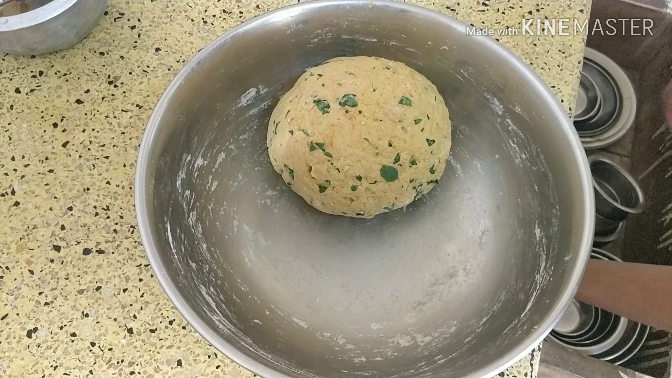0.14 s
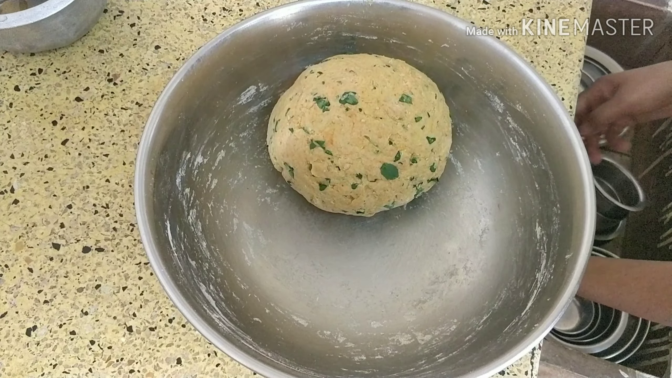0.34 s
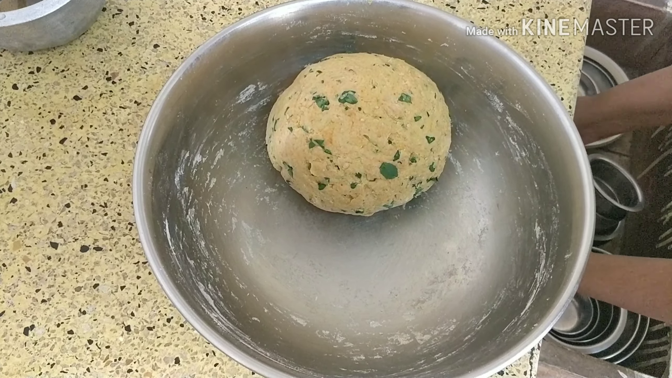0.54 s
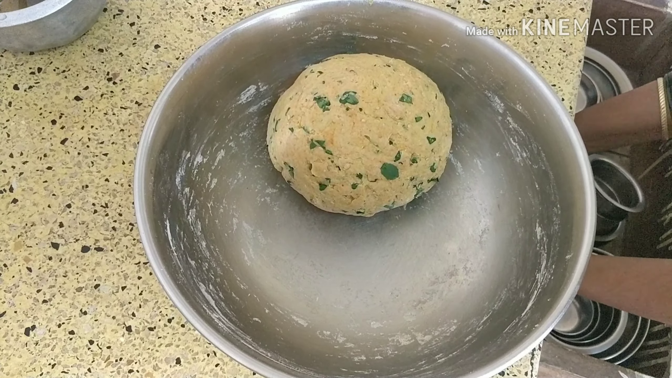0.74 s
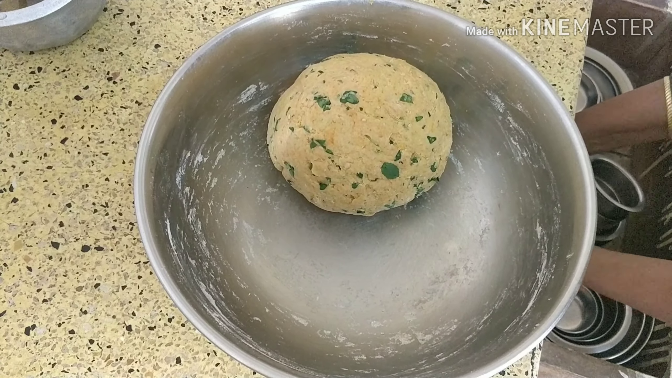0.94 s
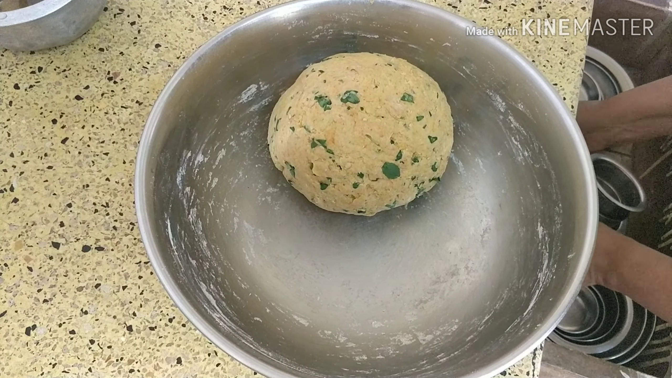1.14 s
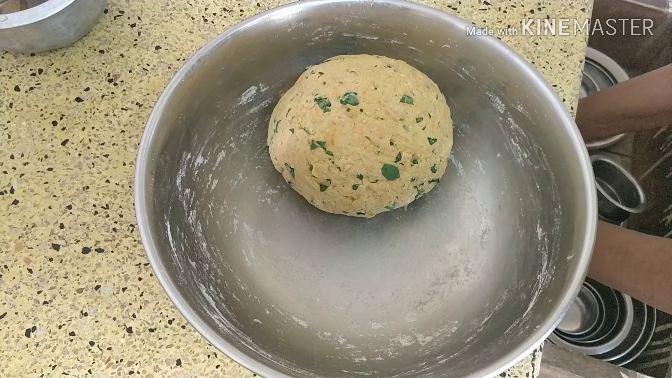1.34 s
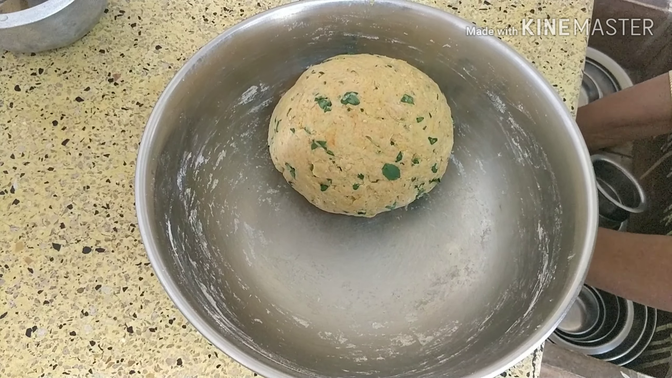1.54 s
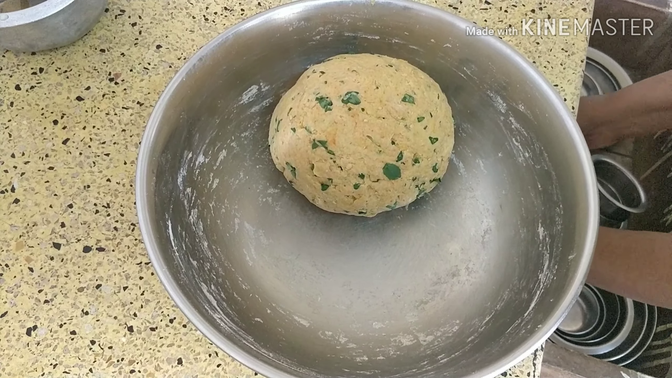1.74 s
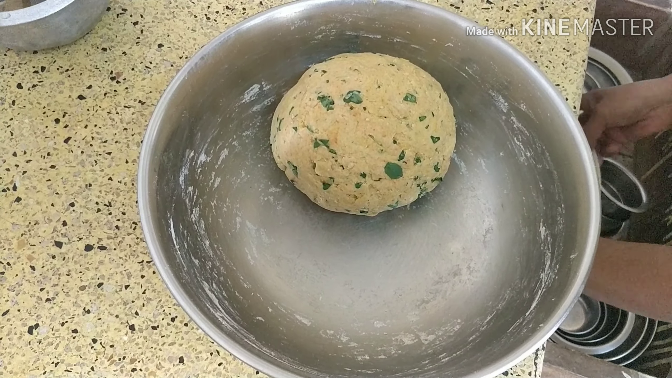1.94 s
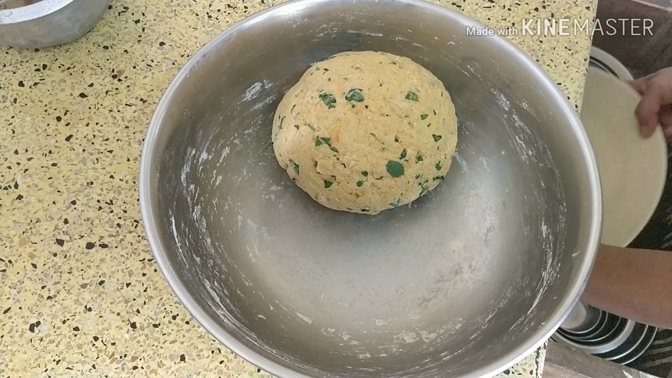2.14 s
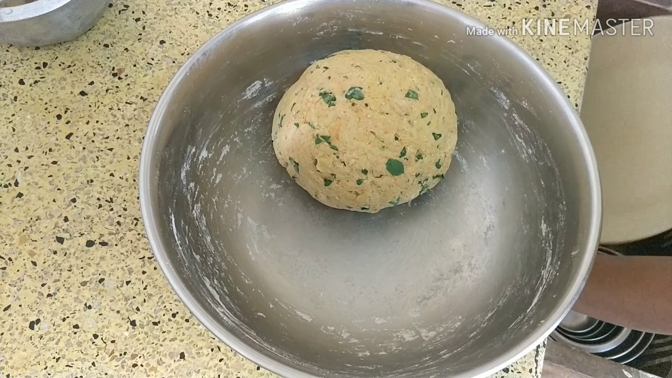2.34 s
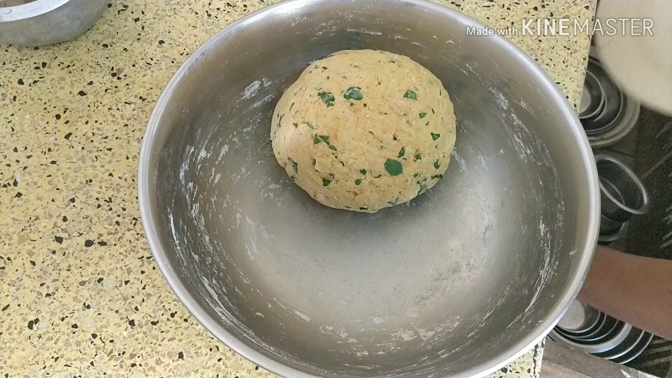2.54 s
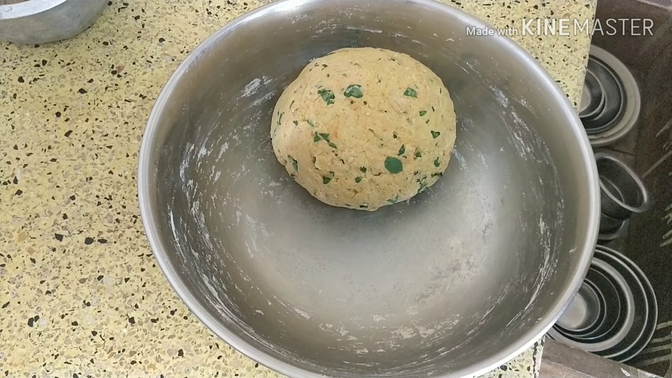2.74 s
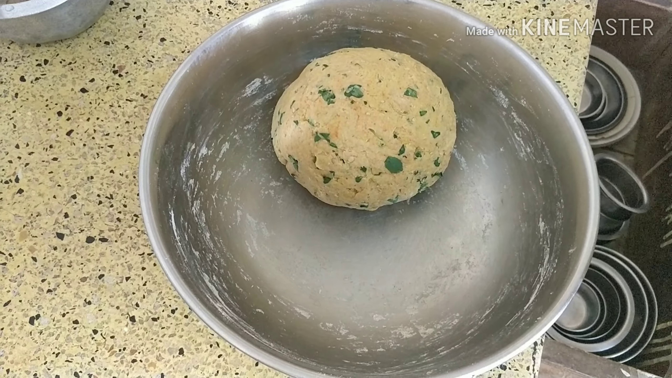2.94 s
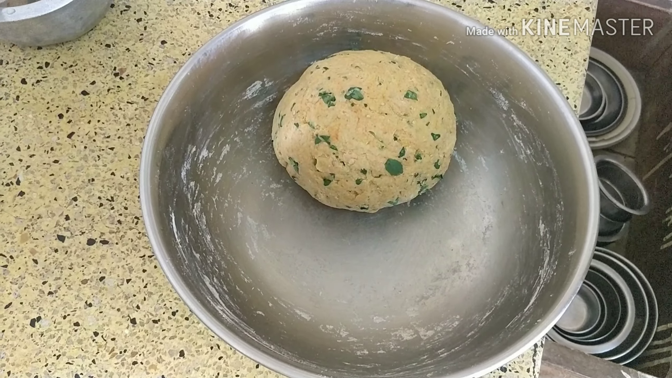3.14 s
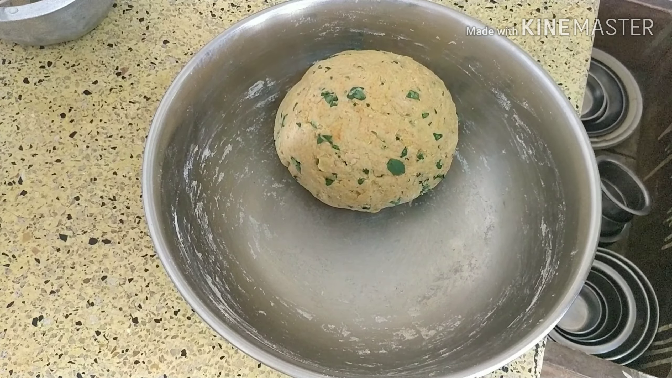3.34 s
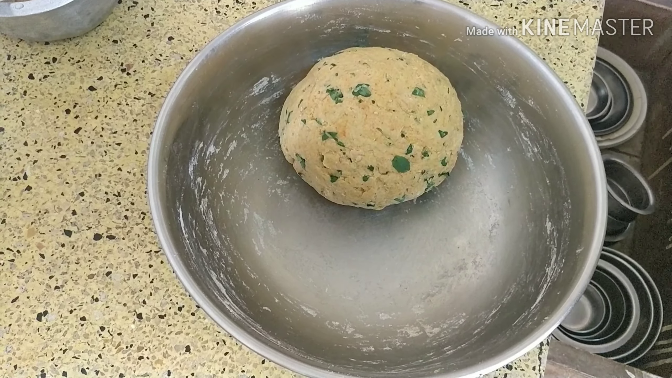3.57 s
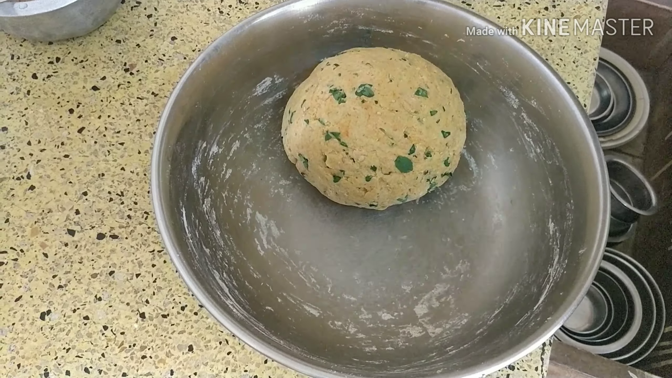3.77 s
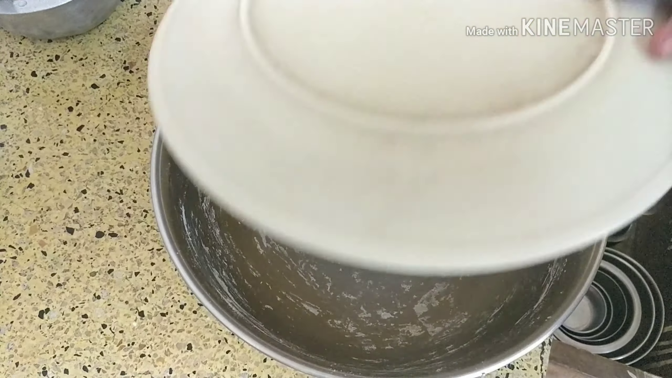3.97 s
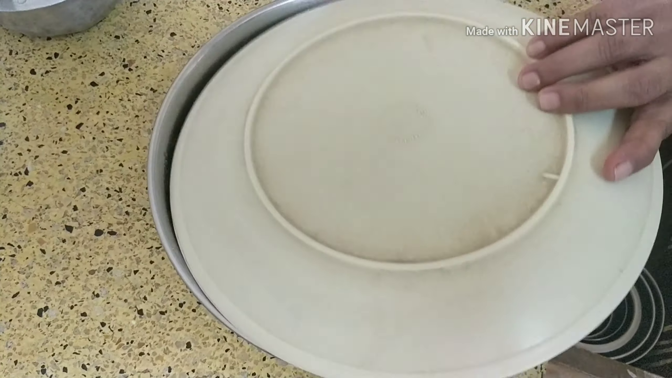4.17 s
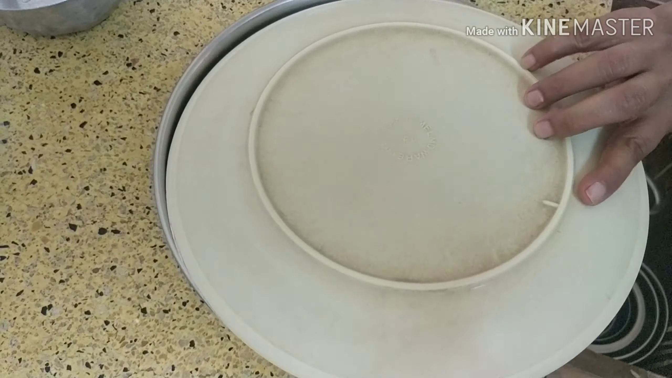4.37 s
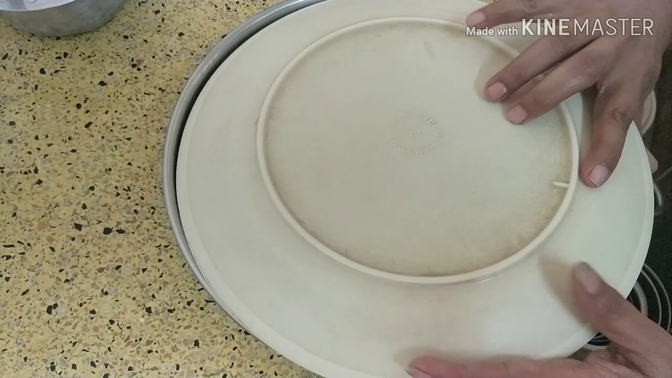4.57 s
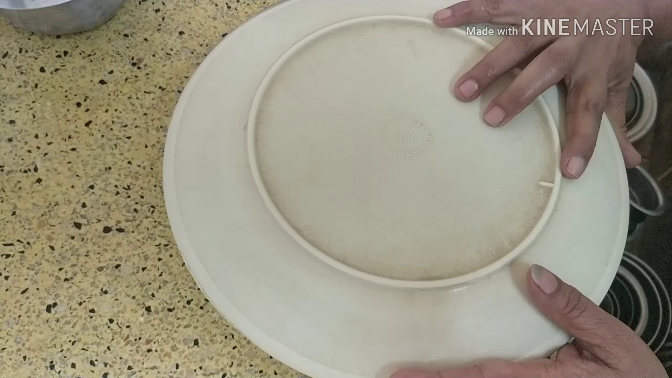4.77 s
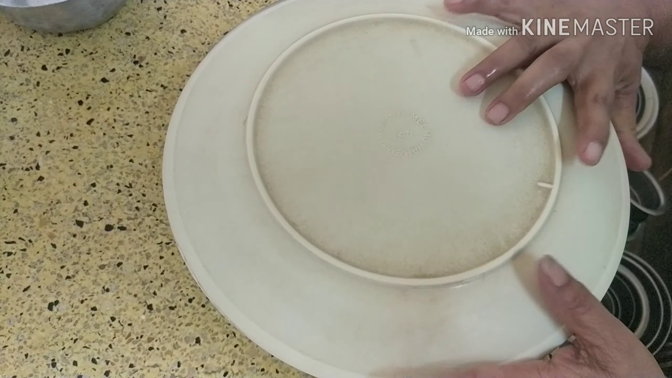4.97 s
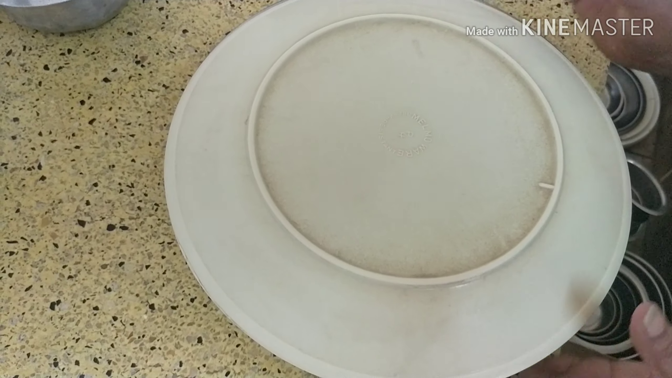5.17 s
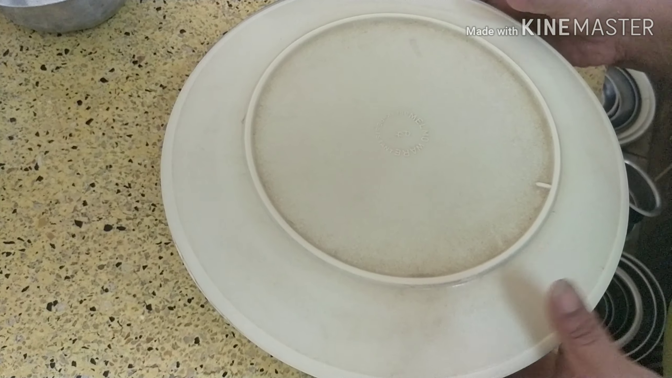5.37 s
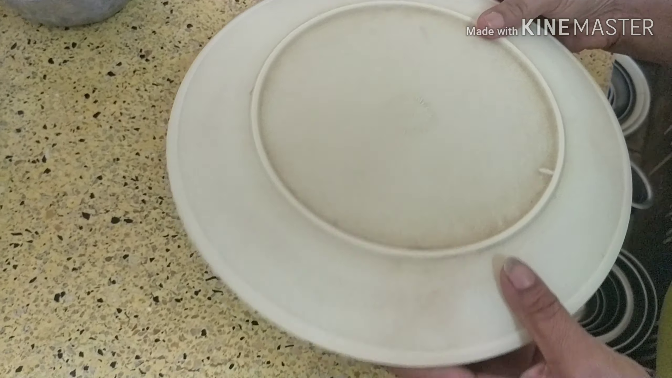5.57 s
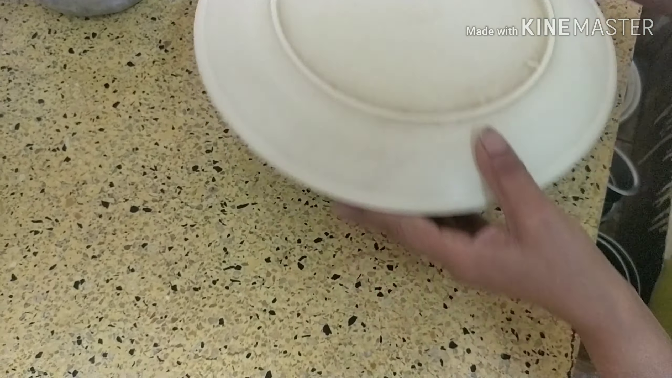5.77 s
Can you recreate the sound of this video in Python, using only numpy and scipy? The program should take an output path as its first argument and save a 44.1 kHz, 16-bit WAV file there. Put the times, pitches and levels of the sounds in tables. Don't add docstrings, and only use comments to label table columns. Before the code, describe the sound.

First come irregular crockery knocks and rough sliding on a low shelf, somewhat distant and reverberant. A hand wipes faintly over the glaze. Then a close, sharp metallic clatter as the plate drops on the bowl's rim, a short ring, a scrape and a strong muffled thump as it seats. Faint nudges and rubbing end it, over rumbling kitchen air, heard by a phone in stereo.

```python
import sys
import numpy as np
from scipy import signal
from scipy.fft import rfft, irfft, next_fast_len
from scipy.io import wavfile
from scipy.ndimage import uniform_filter1d

SR = 44100
rng = np.random.default_rng(int(sys.argv[2]) if len(sys.argv) > 2 else 0)


def pcm_store(signal):
    levels = np.round(np.clip(np.atleast_2d(signal), -1, 1) * 32767)
    wavfile.write(sys.argv[1], SR, levels.astype(np.int16).T)


def elevation(decibels):
    levels = np.asarray(decibels, float)
    return 10 ** (levels / 20)


N = 256044
SECONDS = np.arange(N) / SR
OPPOSED = np.array([[1], [-1]])


def noise():
    return rng.standard_normal(N)


def unit(x):
    return x / np.sqrt(np.mean(x ** 2, axis=-1, keepdims=True))


def colour(x, table, share=1):
    hz, db = np.transpose(table)
    size = next_fast_len(N)
    bins = np.arange(size // 2 + 1) * SR / size
    gain_db = share * np.interp(np.log(bins + 1), np.log(hz + 1), db)
    return irfft(rfft(x, size) * elevation(gain_db), size)[..., :N]


def band(x, hz, width):
    return signal.lfilter(*signal.iirpeak(min(hz, SR / 2.2), hz / width, fs=SR), x)


def walk(rate):
    hold = int(SR / rate)
    levels = np.repeat(rng.standard_normal(N // hold + 1), hold)
    return unit(uniform_filter1d(levels, hold)[:N])


def decay(t60):
    return np.exp(-np.log(1000) / (t60 * SR))


def taps(times, dbs):
    force = np.zeros(N)
    force[(np.asarray(times) * SR).astype(int)] = elevation(dbs)
    return force


def bursts(times, dbs, t60):
    return signal.lfilter([1], [1, -decay(t60)], taps(times, dbs))


def strokes(rows, column):
    gain = 0
    for row in rows:
        peak, rise, fall = row[:3]
        distance = np.where(SECONDS < peak, (peak - SECONDS) / rise, (SECONDS - peak) / fall)
        gain = gain + elevation(row[column] - 25 * distance)
    return gain


def ring(times, dbs, modes, chatter_s, scatter_db):
    out = np.zeros(N)
    span = slice(int(times[0] * SR), int((times[-1] + 1) * SR))
    chance = rng.standard_normal((len(times), len(modes)))
    chatter = noise() * np.sqrt(2 * np.log(1000) / (chatter_s * SR + 1))
    for k, (hz, db, t60) in enumerate(modes):
        force = chatter * bursts(times, dbs + db + scatter_db * chance[:, k], chatter_s)
        pole, turn = decay(t60), 2 * np.pi * hz / SR
        out[span] += signal.lfilter([.5, 0, -.5], [1, -2 * pole * np.cos(turn), pole ** 2], force[span])
    return out


def strike(times, dbs, modes, scatter_db, push_s=0):
    out = np.zeros(N)
    span = slice(int(times[0] * SR), int((times[-1] + 1) * SR))
    chance = rng.standard_normal((len(times), len(modes)))
    for k, (hz, db, t60) in enumerate(modes):
        energy = bursts(times, 2 * (dbs + db + scatter_db * chance[:, k]), t60 / 2)[span]
        energy = np.abs(uniform_filter1d(energy, int(push_s * SR) + 1))
        out[span] += np.sqrt(energy) * np.sin(2 * np.pi * hz * np.arange(len(energy)) / SR)
    return out


def crack(times, dbs, table, t60, click_db):
    scale = np.std(colour(noise(), table))
    sputter = bursts(times, dbs, t60) * noise()
    return colour(taps(times, dbs + click_db) + sputter, table) / scale


# (frequency [Hz], density [dB per Hz])
AIR = [(12, -27), (20, 7.5), (113, -14.5), (234, -21), (357, -15), (388, -15), (434, -23.5), (527, -15.5),
       (624, -20), (825, -25.5), (1370, -35.5), (4180, -38.5), (4810, -39.5), (5680, -47.5), (16000, -49.5)]


def air():
    mid, side = colour(rng.standard_normal((2, N)), AIR)
    side = side - signal.lfilter(*signal.butter(1, 400, fs=SR), side)
    hum = unit(mid + 0.89 * side * OPPOSED) * elevation(-41.5 - 4.5)
    return signal.lfilter(*signal.butter(2, 130, "high", fs=SR), hum)


# (frequency [Hz], width [Hz], level [dB])
ROOM_MODES = [(45.6, 56, -3), (62.3, 18, -1.5), (108, 7.5, -3), (176.6, 16.3, -11.5)]
# (peak [s], rise [s], fall [s], level [dB])
SHAKES = [(0.27, .3, 0.59, -43), (0.66, .15, 0.091, -38.5), (0.81, .1, .3, -37), (1.15, .2, 0.23, -53),
          (1.62, .6, 1.5, -36.5), (2.45, .1, 0.33, -36), (3.16, .5, 0.33, -46), (4.36, .6, 0.15, -41),
          (4.76, .4, 0.24, -35), (5.34, .3, 0.53, -39.5), (5.8, .6, .1, -57)]


def rumble():
    pair = rng.standard_normal((2, N))
    push = pair[0] + 0.06 * pair[1] * OPPOSED
    boom = sum(elevation(db) * unit(band(band(push, hz, width), hz, width)) for hz, width, db in ROOM_MODES)
    steady = elevation(-44.5 + 2.5 * walk(7.2))
    return np.hypot(steady, strokes(SHAKES, column=3)) * unit(boom)


# (frequency [Hz], level [dB], t60 [s])
SHELF = [(185, 2, .1), (321, -3, 0.024), (380.2, 2, 0.081), (468, 8, 0.039), (584.5, 6, 0.025),
         (704, 1.5, 0.028), (816, -7.5, 0.016), (938, -7, 0.011), (1130, -14.5, 0.19), (1560, -22, 0.0095)]
# (frequency [Hz], density [dB per Hz])
GLAZE = [(710, -86), (1200, -52), (1890, -12), (2180, -4), (4130, -2.5), (4650, -0.5), (9310, -8.5),
         (14500, -11), (16000, -22)]
# (peak [s], rise [s], fall [s], rumble level [dB], hiss level [dB])
DRAGS = [(0.0, .1, 0.18, -42.5, -49.5), (0.74, 0.76, .05, -63, -55.5), (0.835, 0.026, 0.12, -34, -29.5),
         (1.25, 0.74, 0.54, -39.5, -74), (1.79, 0.39, 0.21, -40, -40.5), (1.88, 0.065, 0.66, -34.5, -36.5),
         (2.09, 0.17, 0.21, -33, -31.5), (2.17, 0.1, 0.13, -21.5, -30), (2.9, 0.18, .3, -48.5, -47.5),
         (4.71, 0.044, 0.034, -20.5, -31.5), (4.745, 0.014, 0.036, -19, -33),
         (5.335, 0.073, .12, -42, -55.5), (5.58, 0.96, 0.61, -48.5, -55), (5.8, 0.24, 0.089, -40, -40)]


def drag():
    slips = noise() * elevation(2.5 * walk(60)) * elevation(3.5 * rng.exponential(size=N))
    low = sum(elevation(db) * band(band(slips, hz, hz * 0.39), hz, hz * 0.39) for hz, db, _ in SHELF)
    hiss = colour(noise() * elevation(3 * walk(200)), GLAZE)
    low = strokes(DRAGS, column=3) * elevation(-6.5) * unit(low)
    return low + strokes(DRAGS, column=4) * elevation(-7.5) * unit(hiss)


# (time [s], blow level [dB], low thud
# level [dB], bright crack level [dB])
KNOCKS = [(0.03, -44.5, -41, -77), (0.113, -37, -41.5, -52), (0.18, -52, -49, -52),
          (0.241, -39.5, -50, -46), (0.463, -65, -55, -57.5), (0.501, -60, -38, -48.5),
          (0.752, -39.5, -46, -48.5), (0.807, -23.5, -31, -28), (1.007, -25.5, -24.5, -31),
          (1.141, -22.5, -20, -26), (1.29, -27.5, -29.5, -32), (1.376, -35.5, -28, -39.5),
          (1.478, -37, -32, -57), (1.586, -28, -27.5, -32.5), (1.844, -34, -38.5, -30.5),
          (1.971, -27, -37, -34), (2.018, -26, -35, -35.5), (2.068, -28, -24.5, -40),
          (2.078, -17, -38, -21), (2.159, -26.5, -28, -26.5), (2.225, -32.5, -39, -31),
          (2.297, -49, -50.5, -94.5), (2.442, -21.5, -27.5, -30.5), (2.606, -38.5, -46.5, -51.5),
          (5.601, -58, -37, -70), (5.678, -57, -34, -45), (5.752, -55, -34, -71)]


def stack():
    s, blow_db, thud_db, crack_db = np.transpose(KNOCKS)
    body = ring(s, blow_db - 9, SHELF[1:], 0.063, scatter_db=0)
    thud_modes = [(103.5, -5, 0.095), (183.2, 1.5, 0.057), (286, -6, 0.15)]  # Hz, dB, t60 s
    thud = ring(s, thud_db - 3, thud_modes, 0.17, scatter_db=4.5)
    thud = signal.lfilter(*signal.butter(2, 400, fs=SR), thud)
    return body + thud + crack(s, crack_db + 2, GLAZE, 0.055, click_db=11)


# (time [s], level [dB], frequency [Hz])
TICKS = [
    (0.504, -39.5, 13500),
    (3.7669, -35.5, 14800),
    (5.683, -46, 12700),
]


def nail_ticks():
    return sum(bursts([s], db, 0.0097) * elevation(7) * unit(band(noise(), hz, 4000)) for s, db, hz in TICKS)


# (frequency [Hz], density [dB per Hz])
SKIN = [(880, -43), (1500, -17), (1940, -19), (5020, -2), (6000, -7), (8160, -1.5), (9470, -3.5),
        (14500, 4), (16000, -9)]
# (peak [s], rise [s], fall [s], level [dB])
WIPE = [(2.96, 0.085, 1, -52.5), (3.1, 0.15, 0.2, -44.5), (3.26, 0.32, 0.13, -40.5),
        (3.41, 0.52, 0.095, -46), (3.68, 0.51, 0.11, -54), (4.465, 0.034, 0.024, -52),
        (4.72, .35, 0.07, -47), (5.0, .05, .2, -64), (5.3, .06, 0.49, -63), (5.71, 0.12, 0.11, -43.5),
        (5.8, .2, .1, -43.5)]


def wipe():
    skin = unit(colour(rng.standard_normal((2, N)) * elevation(1.5 * walk(25)), SKIN))
    return strokes(WIPE, column=3) * skin


# (start [s], end [s], frequency [Hz], level [dB])
WHISTLES = [
    (3.748, 4.21, 5000, -77),
    (5.08, 5.325, 5000, -77),
    (5.095, 5.32, 2700, -72.5),
]


def whistles():
    out = 0
    for start, end, hz, db in WHISTLES:
        gain_db = np.interp(SECONDS, [start, start + 0.052, end], [db - 4, db, db], -120, -120)
        out = out + elevation(gain_db) * unit(band(noise(), hz, 30))
    return out


# (time [s], plate body level [dB], low, middle and high rim levels [dB])
BLOWS = [
    (4.1332, -21.5, -21, -43, -19),
    (4.212, -15, -23, -23.5, -19.5),
    (4.226, -27.5, -17.5, -35, -33.5),
    (4.2314, -20.5, -31, -47, -38.5),
    (4.2578, -25.5, -18, -26, -28.5),
    (4.281, -27, -34, -30.5, -42),
    (4.299, -33, -44, -43, -44),
]
# (frequency [Hz], level [dB], t60 [s])
EDGE = [(285, -8, .08), (525, 0, .05), (620, -4, .04), (1139, -5, .05), (1595, -4, .06), (1778, 1, .06),
        (4613, -13, .07), (5074, -10, .09), (5416, -9, .1), (5627, 1, .09), (6420, -6, .08),
        (7244, -14, .06)]
# (frequency [Hz], level [dB], t60 [s])
PLATE = [(290, -9, .15), (345, -10, .1), (426, -5, .14), (453, -7, .12), (552, 1, .08), (626, -1, .07),
         (870, -9, .05)]
# (frequency [Hz], level [dB], t60 [s])
RIM_LOW = [(1117, 0, .13), (1135, -1, .1), (1513, -10, .12), (1592, -6, .4), (1621, -5, .15),
           (1714, -3, .15), (1770, -4, .1), (2100, -9, .07)]
# (frequency [Hz], level [dB], t60 [s])
RIM_MID = [(2681, -12, .45), (3579, -3, .3), (3623, -4, .3), (3711, -1, .25), (3790, -6, .2),
           (3895, -3, .35), (4430, -10, .35), (4624, -9, .2)]
# (frequency [Hz], level [dB], t60 [s])
RIM_HIGH = [(5076, -9, .25), (5405, -8, .35), (5631, -1, .3), (5895, -7, .25), (6330, -4, .15),
            (6514, -9, .2), (7257, -8, .2), (7467, 3, .07), (7650, -8, .25), (8120, -13, .2),
            (8856, -10, .15)]
RING_DB = [0, 2.5, 1, -2]
RING_SHARE = [1, 1.1, 1, .85]
RATTLE_DB = [1, -1, -1, 1]


def bowl():
    s, *group_db = np.transpose(BLOWS)
    crack_db = group_db[-1] - 1.5 + 9.5 * (s == s[0])
    out = crack(s, crack_db, SKIN, 0.018, click_db=17.5)
    out += strike(s[:1], -16.5, EDGE, scatter_db=0.5)
    groups = [PLATE, RIM_LOW, RIM_MID, RIM_HIGH]
    for modes, db, ring_db, share in zip(groups, group_db, RING_DB, RING_SHARE):
        out += strike(s[1:], db[1:] + ring_db, np.array(modes) * [1, 1, share], scatter_db=1.5)
    centres_hz, widths_hz = [550, 1500, 3300, 6800], [400, 1000, 2000, 4500]
    for hz, width, db, rattle_db in zip(centres_hz, widths_hz, group_db, RATTLE_DB):
        out += bursts(s, db + rattle_db, 0.14) * unit(band(band(noise(), hz, width), hz, width))
    return signal.lfilter(*signal.butter(2, 260, "high", fs=SR), out)


# (time [s], thud level [dB], crack level [dB])
SETTLE = [
    (4.692, -28, -43),
    (4.704, -21, -53),
    (4.716, -20, -34),
    (4.743, -7.5, -17.5),
    (4.764, -29, -51),
    (4.774, -24, -47),
    (4.783, -27, -29.5),
    (4.851, -42, -59),
    (5.327, -31, -57),
    (5.347, -28.5, -65),
]
# (frequency [Hz], level [dB], t60 [s])
LID = [(186, -9, 0.13), (222.7, -8, 0.1), (292, 0, 0.08), (355, 1, 0.04), (529, 2, 0.04), (636, -2, 0.05),
       (844, -7, 0.04), (1150, -18, .03)]


def lid():
    s, thud_db, crack_db = np.transpose(SETTLE)
    body = strike(s, thud_db - 9.5, LID, scatter_db=3.5, push_s=0.0049)
    body += ring(s - 0.003, thud_db - 11.5, LID, 0.025, scatter_db=3)
    sputter = crack(s, crack_db - 5, GLAZE, 0.045, click_db=0)
    return signal.lfilter(*signal.butter(2, 1000, fs=SR), body) + sputter


# (time [s], length [s], start frequency [Hz], end frequency [Hz], level [dB])
SQUEAK = (5.266, .014, 12300, 15000, -34)


def squeak():
    start, length, low_hz, high_hz, db = SQUEAK
    along = np.clip((SECONDS - start) / length, 0, 1)
    pitch = low_hz + (high_hz - low_hz) * along + 300 * walk(3000)
    return elevation(db) * np.sin(np.pi * along) * np.sin(2 * np.pi * np.cumsum(pitch) / SR)


# (frequency [Hz], t60 [s])
ROOM_T60 = [(150, 0.89), (600, 0.52), (2000, 0.54), (6000, 0.54), (12000, 0.17)]


def room(x):
    t = np.arange(int(.9 * SR)) / SR
    tail = 0
    for hz, t60 in ROOM_T60:
        mid, side = rng.standard_normal((2, len(t)))
        echoes = mid + min(0.08 + hz / 1500, 1) * side * OPPOSED
        tail = tail + band(echoes, hz, 1.6 * hz) * np.exp(-np.log(1000) * t / t60)
    tail = tail * (1 - np.exp(-t / 0.00043))
    tail = tail / np.sqrt(np.sum(tail ** 2) / 2)
    return signal.fftconvolve(x[None], tail, axes=1)[:, :N]


def scene():
    far, near, touch = drag() + stack(), bowl() + lid(), nail_ticks() + squeak()
    direct = far + near + touch
    late = np.interp(np.arange(N) - 0.00018 * SR, np.arange(N), direct)
    wet = room(elevation(0.5) * far + elevation(-5) * near + elevation(-3.5) * touch)
    return np.array([late, direct]) + wet + wipe() + air() + rumble() + whistles()


# (frequency [Hz], left minus right level [dB])
PORTS = [(60, 0.5), (110, 3), (200, 1), (380, 0.5), (700, 2), (1290, -0.5), (2380, 5), (4400, -2),
         (8120, -14.5), (15000, 11)]


def port_colour(dry):
    return np.array([colour(dry[0], PORTS, 0.59), colour(dry[1], PORTS, -0.26)])


# (frequency [Hz], share of the time [1])
STARVE = [(1700, 0), (3200, .15), (5000, .07), (6100, .45), (6800, .08), (9200, .25), (11300, .35),
          (13500, .16), (15500, .14)]


def starve(x):
    hz, _, z = signal.stft(x, SR, nperseg=2048)
    frames = z.shape[2]
    luck = uniform_filter1d(rng.standard_normal((129, frames)), size=3, axis=1)
    rank = luck.argsort(axis=1).argsort(axis=1) / frames
    rank = np.repeat(rank, 8, axis=0)[:len(hz)]
    treble_db = 10 * np.log10(np.sum(np.abs(z[:, hz > 2000]) ** 2, axis=(0, 1)) + 1e-18)
    attack = np.diff(treble_db, prepend=0) > 4
    calm = ~(attack | np.roll(attack, 1))
    silent_share = np.interp(hz, *np.transpose(STARVE))[:, None]
    z *= np.where((rank < silent_share) & calm, .03, 1)
    return signal.istft(z, SR, nperseg=2048)[1][:, :N]


def top_cut(x):
    return signal.sosfilt(signal.butter(12, 16470, fs=SR, output="sos"), x)


def record(dry):
    ceiling, top_hz = 0.85, 15500
    ports = ceiling * np.tanh(port_colour(dry) / ceiling)
    ports = signal.sosfilt(signal.ellip(8, .2, 60, top_hz, fs=SR, output="sos"), ports)
    mix = starve(ports)
    return top_cut(mix)


dry = scene()
out = record(dry)
pcm_store(out)
```